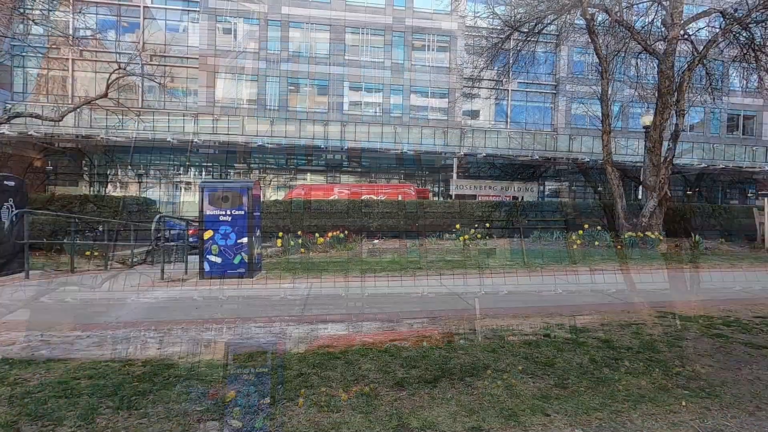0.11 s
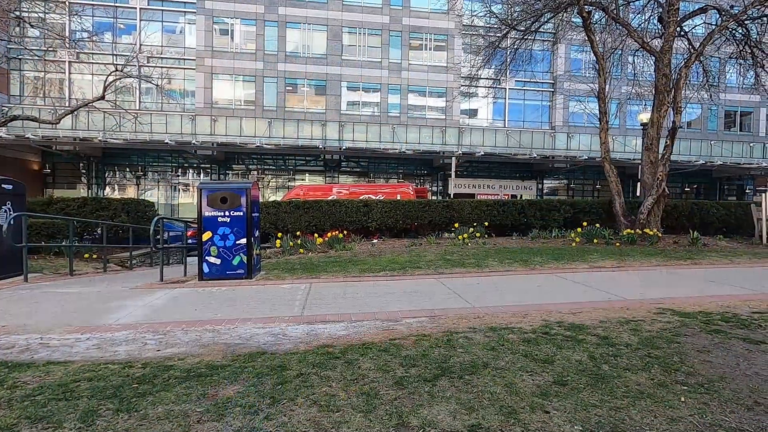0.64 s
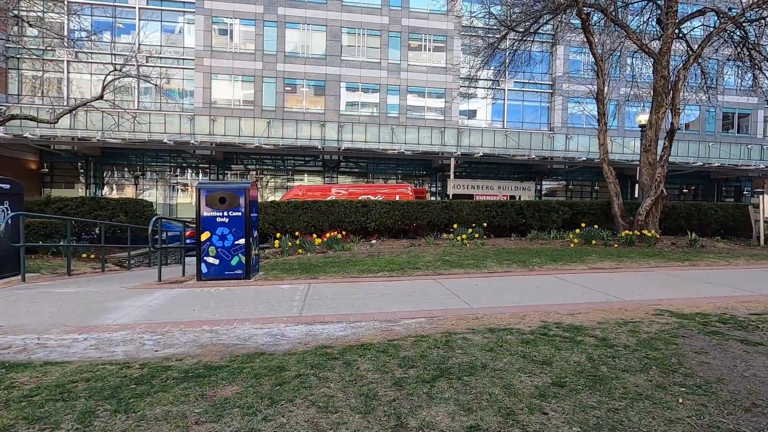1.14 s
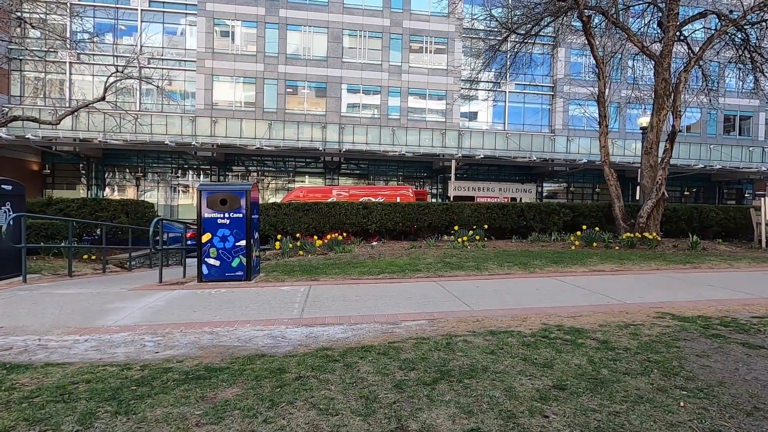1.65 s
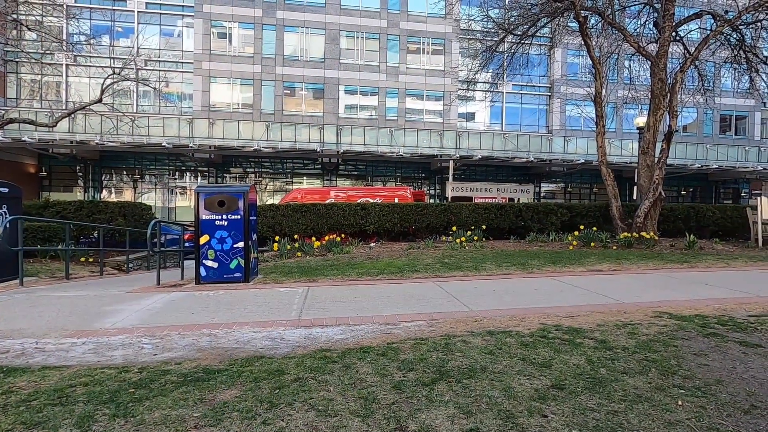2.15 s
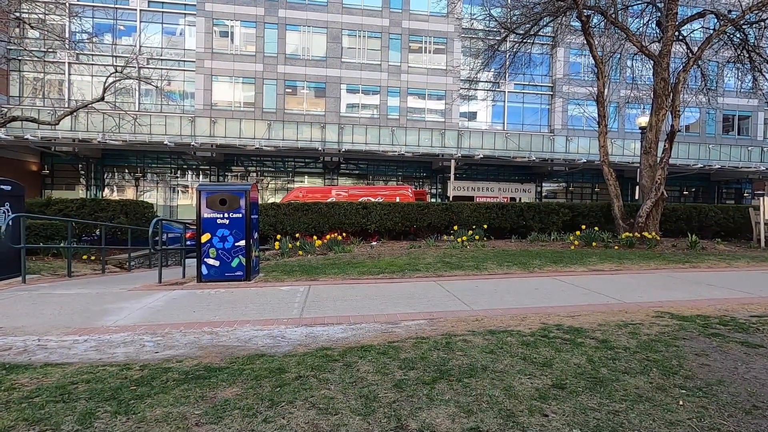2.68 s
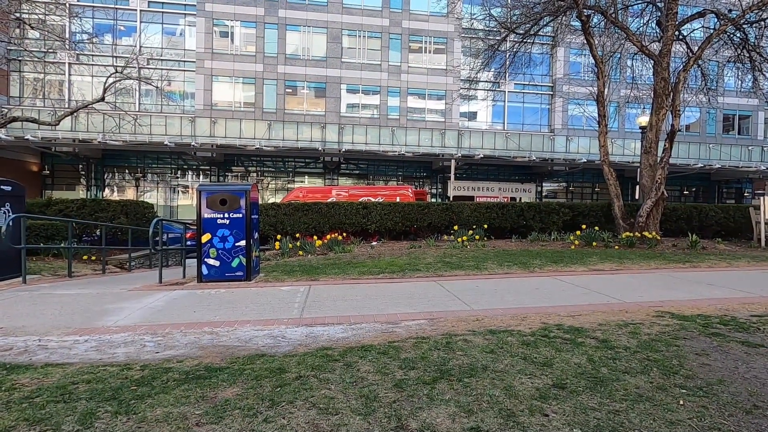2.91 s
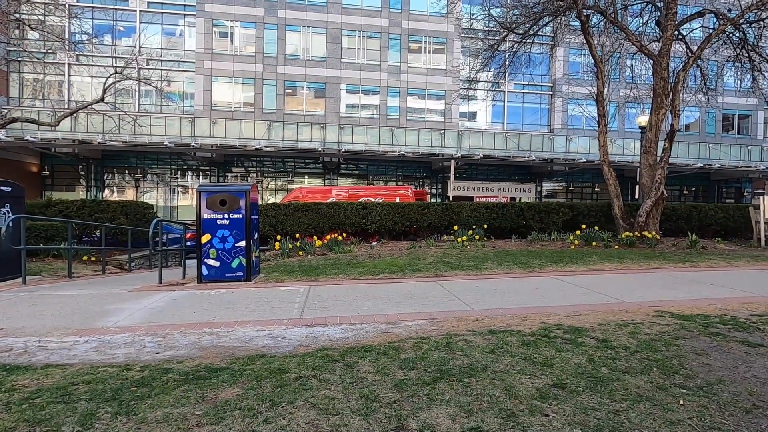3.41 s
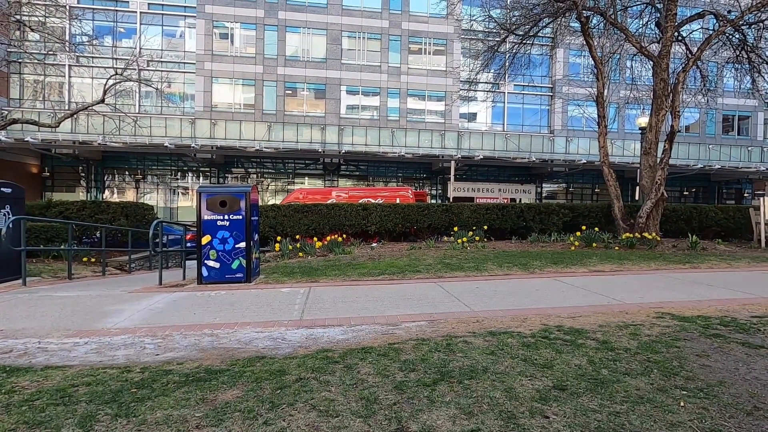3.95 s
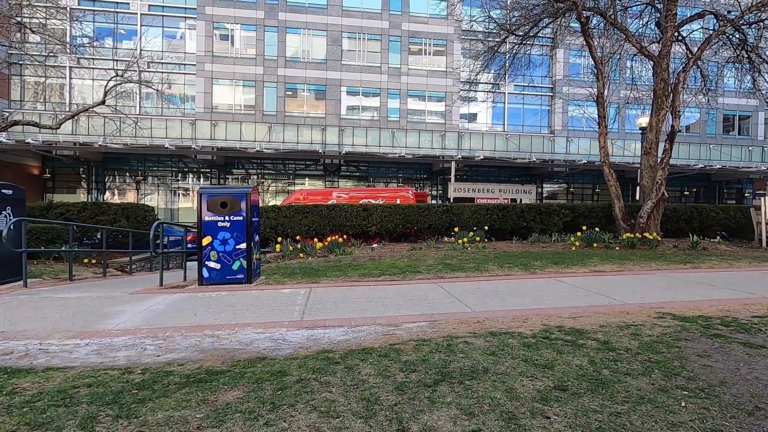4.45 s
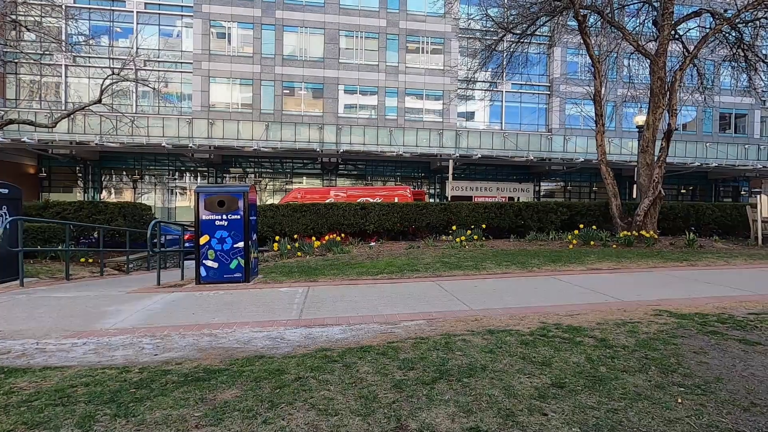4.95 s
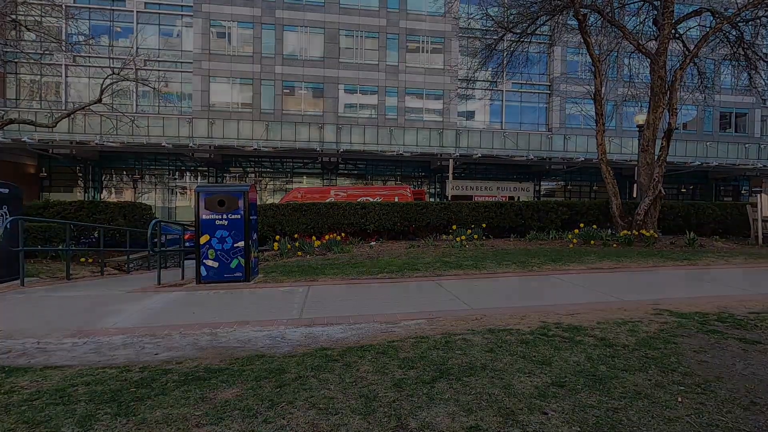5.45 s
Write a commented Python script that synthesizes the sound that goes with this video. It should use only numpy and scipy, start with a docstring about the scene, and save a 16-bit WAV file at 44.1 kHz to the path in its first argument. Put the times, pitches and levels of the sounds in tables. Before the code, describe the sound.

A quiet urban park in stereo. Throughout lies a low, soft traffic rumble with smooth tyre roar and an unsteady, slightly beating ventilation hum; it is fullest around 1 s, sinks from about 2 s and is fading out by 5.6 s. Slightly left, a starling begins with a thin, very high whistle until 0.4 s, with a tiny bill snap near 0.07 s. A soft, quick rattle swells and hooks upward at 0.7-1.0 s, a short buzz follows at 1.2 s, another rattle at 1.5-1.8 s and a buzz at 2.0 s. A louder, sinking trill runs from 2.3 to 2.6 s, ending in a brief buzz and slow flicks by 2.8 s. Slightly right, a sparrow gives bright two-note chirps near 0.3, 1.4, 2.3 and 3.8 s, and faintly at 5.1 s. Faint far birds dot the background, and a building returns a light echo.

```python
"""A starling to the left whistles, snaps its bill, rattles, buzzes and trills: sine voices with flicking pitch.
A sparrow to the right repeats a two-note chirp of gliding sines in a soft hiss; fainter birds call far off.
Under them a quiet city is heard from a park: traffic in shaped stereo noise and a ventilation plant humming
in unsteady sines, in time fading away. A building front echoes the birds with one slap and a noise-built tail."""
import sys
import numpy as np
from scipy import signal
from scipy.fft import rfft, irfft, next_fast_len
from scipy.io import wavfile
from scipy.ndimage import uniform_filter1d, map_coordinates

SR = 44100
rng = np.random.default_rng(int(sys.argv[2]) if len(sys.argv) > 2 else 0)


def decibels_to_gain(level_db):
    """Convert a level in decibels to a linear amplitude gain (20 dB per decade)."""
    exponent = np.asarray(level_db, float) / 20
    return 10 ** exponent


def waveform_to_disk(signal):
    """Save audio, clipped to [-1, 1], as 16-bit WAV at the path in sys.argv[1]."""
    frames = np.transpose(np.atleast_2d(signal))
    scaled = np.clip(frames, -1, 1) * 32767
    samples = np.round(scaled).astype(np.int16)
    wavfile.write(sys.argv[1], SR, samples)


N = 246067


def unit(x):
    """Scales to an rms of 1."""
    return x / np.sqrt(np.mean(x ** 2) + 1e-20)


def along(points, hz):
    """Reads a curve of (frequency, value) points on a log frequency axis."""
    f, v = np.transpose(points)
    return np.interp(np.log(hz + 1), np.log(f + 1), v)


def wobble(rate, size=N):
    """A smooth random curve with this many knots a second."""
    knots = rng.standard_normal(int(size * rate / SR) + 4)
    return map_coordinates(knots, [np.arange(size) * rate / SR])


def filtered(x, response):
    """Multiplies the spectrum by a complex response of frequency."""
    m = next_fast_len(N + 8192)
    return irfft(rfft(x, m) * response(np.fft.rfftfreq(m, 1 / SR)), m)[..., :N]


def shaped_noise(spectrum):
    """Mono noise of rms 1 with this spectrum."""
    return unit(filtered(rng.standard_normal(N), lambda hz: decibels_to_gain(along(spectrum, hz))))


def sampled(rows):
    """Sample times over the rows' span, then each column drawn as straight lines between the rows."""
    s, *cols = np.transpose(rows)
    t = np.arange(s[0], s[-1], 1 / SR)
    return t, *[np.interp(t, s, c) for c in cols]


def add(track, t, hz, db, overtone_db, waver_hz, flutter_db):
    """A sung tone: an unsteady sine with two rough overtones and a little air, with soft ends."""
    size = len(t)
    phase = 2 * np.pi * np.cumsum(hz + waver_hz * wobble(350, size)) / SR
    ends = np.clip(np.minimum(t - t[0], t[-1] - t) / .003, 0, 1)
    rasp = decibels_to_gain(overtone_db) * (0.77 + wobble(680, size))
    air = decibels_to_gain(-14) * rng.standard_normal(size)
    overtones = np.sin(2 * phase) + decibels_to_gain(-3) * np.sin(3 * phase) + air
    tone = np.sin(phase) + rasp * overtones
    level = decibels_to_gain(db + flutter_db * wobble(250, size))
    track[round(t[0] * SR):][:size] += np.sqrt(2) * ends * level * tone


def flicked(t, hz, db, flick_hz, gap_ms, growth_ms, sharp, swell_db, share, overtone_db,
            hush_db=16, hold_db=0):
    """A phrase whose pitch flicks upward once a beat, the voice swelling up it and sinking on the way down."""
    track, k = np.zeros(N), np.arange(60)
    beat_s = (k * gap_ms + growth_ms * k * (k - 1) / 2) / 1000
    beat = np.interp(t, t[0] + beat_s, k)
    effort = 1 + 0.11 * np.interp(beat, k, rng.standard_normal(len(k)))  # no two flicks alike
    flick = np.abs(np.cos(np.pi * beat)) ** (2 * sharp)
    held = np.sin(np.pi * beat) ** 4  # a level note between two flicks
    swell = swell_db * effort * flick * np.clip(flick_hz / 500, 0, 1)  # small flicks swell less
    rise_hz = flick_hz * (flick + share * held)
    fall_hz_per_s = -np.gradient(rise_hz) * SR
    hush = hush_db * np.clip(fall_hz_per_s / 10 ** 6, 0, 1)
    level_db = db + swell + hold_db * held - hush
    add(track, t, hz + rise_hz, level_db, overtone_db, waver_hz=122, flutter_db=1.5)
    return track


# stereo likeness of the city: frequency_hz, left_right_correlation
CITY_LIKENESS = [(40, .8), (120, .95), (300, .99), (1000, .84), (4300, .6), (9000, .2)]
# phase between the ports, also for sparrow and far birds: frequency_hz, left_lead_rad
STREET_LEAD = [(100, 0), (900, -.3), (3600, -.85), (5000, -.6), (7000, -1.2)]
# level between the ports: frequency_hz, left_over_right_db
CITY_LEAN = [(40, 1.3), (160, .3), (600, 2), (8000, 0)]


def rush(spectrum, patchy_db):
    """Stereo noise of rms 1 with faint patches in time and pitch, spread and tilted between the ports."""
    z = signal.stft(rng.standard_normal((2, N)), nperseg=512)[2]
    field = uniform_filter1d(rng.standard_normal(z.shape[1:]), 5, 0)
    patches = unit(uniform_filter1d(field, 12, 1))
    pair = signal.istft(z * decibels_to_gain(patchy_db * patches), nperseg=512)[1][:, :N]

    def spread(hz):
        turn = np.arccos(np.clip(along(CITY_LIKENESS, hz), -1, 1)) / 2
        return decibels_to_gain(along(spectrum, hz)) * [np.cos(turn), np.sin(turn)]

    def ports(hz):
        half = np.array([[.5], [-.5]])
        return decibels_to_gain(half * along(CITY_LEAN, hz)) * np.exp(1j * half * along(STREET_LEAD, hz))

    mid, side = filtered(pair, spread)
    return unit(filtered(np.array([mid + side, mid - side]), ports))


# city levels: time_s, rumble_db, tyre_roar_db
CITY_LEVELS = [(0, -37, -48), (1, -36, -47.5), (2.2, -37.5, -49.5), (3.2, -40.5, -51.5),
               (4.2, -42.5, -53.5), (4.699, -45.5, -57), (5.58, -51.5, -60.5)]
# engine rumble spectrum: frequency_hz, relative_db_per_hz
RUMBLE_SPECTRUM = [(10, -30), (18, -6.5), (48, 1), (200, -2), (290, -6), (450, -17.5), (700, -70),
                   (1000, -120)]
# tyre roar spectrum: frequency_hz, relative_db_per_hz
ROAR_SPECTRUM = [(180, -32), (300, -8.5), (400, -12.5), (700, -15.5), (1400, -24), (2200, -34), (3200, -40),
                 (5200, -48), (6300, -59.5), (9000, -65.5), (12000, -90.5), (16000, -120)]
# ventilation tones: pitch_hz, level_over_roar_db, waver_hz
FAN_TONES = [(295.7, -0.5, 0.41), (298.4, -3, 0.49), (597, -15, 2.94), (920, -19, 3), (210, -4, 6.6)]


def city():
    """Engines rumble and tyres roar as noise; the close fan tones beat against each other over them."""
    t = np.arange(N) / SR
    s, *levels = np.transpose(CITY_LEVELS)
    rumble_db, roar_db = [np.interp(t, s, level) for level in levels]
    hum = np.zeros(N)
    for hz, db, waver_hz in FAN_TONES:
        level = np.sqrt(2) * decibels_to_gain(db + 1.6 * wobble(3.93))
        hum += level * np.sin(2 * np.pi * np.cumsum(hz + waver_hz * wobble(6)) / SR)
    rumble = decibels_to_gain(rumble_db + 1.1 * wobble(2.94)) * rush(RUMBLE_SPECTRUM, patchy_db=0.36)
    roar_and_hum = decibels_to_gain(roar_db) * (rush(ROAR_SPECTRUM, patchy_db=0.86) + hum)
    fade_in = np.clip(t / .008, 0, 1)
    return fade_in * (rumble + roar_and_hum)


# starling's opening note: time_s, pitch_hz, level_db
WHISTLE_NOTE = [(0, 6700, -74), (.04, 6800, -86), (.06, 7540, -65.5), (.07, 7500, -78), (.095, 7500, -72),
                (.105, 7530, -69.5), (.13, 7280, -63.5), (.155, 8050, -65.5), (.2, 8010, -61),
                (.385, 7960, -61), (.403, 6960, -73)]


def whistle():
    """The starling's long thin opening note, almost a pure sine."""
    track = np.zeros(N)
    add(track, *sampled(WHISTLE_NOTE), overtone_db=-58, waver_hz=60, flutter_db=2)
    return track


# single far calls: start_s, length_s, start_hz, end_hz, arch_hz, level_db (at the middle)
FAR_CALLS = [(1.263, 0.041, 4170, 4250, -350, -68), (1.995, 0.044, 2850, 2695, 205, -66),
             (2.258, 0.023, 2710, 2230, 53, -60.5), (3.22, 0.055, 2800, 2670, 179, -73),
             (3.375, 0.032, 3000, 3250, -100, -73), (4.365, 0.022, 2800, 2940, 52, -76)]


def far_birds():
    """Short soft arched glides from further off, over a faint scattered chatter that fades with the city."""
    track = np.zeros(N)
    s, _, roar_db = np.transpose(CITY_LEVELS)
    when, size, low, fall, loud = rng.random((140, 5)).T
    first_s, first_hz = when * (N / SR - .1), 3000 + 2300 * low
    chatter_db = np.interp(first_s, s, roar_db) - 39 + 7 * loud
    chatter = np.transpose([first_s, .015 + .025 * size, first_hz, first_hz - 900 * fall,
                            300 * size, chatter_db])
    for start_s, length_s, start_hz, end_hz, arch_hz, db in [*FAR_CALLS, *chatter]:
        u = np.arange(0, length_s, 1 / SR) / length_s
        arch = np.sin(np.pi * u)
        pitch_hz = start_hz + (end_hz - start_hz) * u + arch_hz * arch
        add(track, start_s + u * length_s, pitch_hz, db - 9 * (1 - arch),
            overtone_db=-40, waver_hz=50, flutter_db=1.5)
    return track


# starling's bill: start_s, level_db (before onset and decay), pitch_hz
BILL_SNAPS = [(.068, -47, 6560)]


def bill_snap():
    """The bill clicks shut: a sine and bright noise that start at once and die within milliseconds."""
    track = np.zeros(N)
    t = np.arange(SR // 100) / SR
    for s, db, hz in BILL_SNAPS:
        envelope = decibels_to_gain(db - 60 * t / 0.0042) * (1 - np.exp(-t / 0.00019))
        click = .3 * np.diff(rng.standard_normal(len(t) + 1))
        track[round(s * SR):][:len(t)] += envelope * (np.sin(2 * np.pi * hz * t) + click)
    return track


# sparrow's chirps: start_s, level_db, pitch_factor
SPARROW_CALLS = [(.291, -50, 1.037), (1.4435, -48.5, 0.99), (2.27, -52.5, 1.01), (3.754, -52, 1.01),
                 (5.09, -62, 1)]
# two notes and a thin upper voice, a list each: time_from_start_s, pitch_hz (before factor), relative_db
CHIRP_NOTES = [
    [(0, 3970, -17), (.009, 4500, -14.5), (.015, 4680, -7.5), (.024, 3780, -8.5), (.04, 3620, -10.5),
     (.049, 3350, -9)],
    [(.056, 3100, -14), (.07, 3330, -7.5), (.085, 3340, -6.5), (.09, 2833, -9.5), (.096, 3270, -11.5),
     (.102, 2750, -15)],
    [(.024, 5300, -22.5), (.03, 5350, -18), (.036, 5300, -24), (.051, 3800, -18.5), (.064, 4500, -26)],
]
# hiss around each chirp: frequency_hz, relative_db_per_hz
BREATH_SPECTRUM = [(2500, -60.5), (3300, -6), (5000, 0.5), (7000, -9.5), (12000, -22), (15000, -61)]


def sparrow():
    """One chirp of gliding sines in a soft hiss, repeated a little louder, softer, higher or lower."""
    breath_db, breath_lead_s, breath_s = -22.5, 0.061, 0.058  # breath_s: length of the rise and of the fall
    track, puff, time = np.zeros(N), np.zeros(N), np.arange(N) / SR
    for s, level_db, factor in SPARROW_CALLS:
        peak_s = s - breath_lead_s + breath_s
        puff += decibels_to_gain(level_db + breath_db) * np.clip(1 - np.abs(time - peak_s) / breath_s, 0, 1)
        for note in CHIRP_NOTES:
            t, hz, db = sampled(note)
            add(track, t + s, factor * hz, db + level_db, overtone_db=-32, waver_hz=45, flutter_db=1.5)
    return track + puff * shaped_noise(BREATH_SPECTRUM)


# hiss of the bill under a rattle: frequency_hz, relative_db_per_hz
BILL_HISS = [(4300, -60), (5200, 1), (7600, -6.5), (8300, -60)]


def rattle(first, top, hz, db, gap_ms, growth_ms, swell_db):
    """Flicks swell on one pitch, then melt into a climbing hook that breaks off downward."""
    rise_db, full_s, flick_hz = 13.5, 0.18, 800  # swells by rise_db, full this long before the top
    hook_s, hook_bend, hook_top_hz, hook_under_db = .11, 1.9, 7500, 7  # hook_under_db: below the flicks
    drop_s, drop_hz, hiss_db = 0.011, 5100, 4.5  # hiss_db: over the voice between flicks
    t = np.arange(first, top + drop_s, 1 / SR)
    climb = np.clip(1 - (top - t) / hook_s, 0, 1)
    drop = np.clip((t - top) / drop_s, 0, 1)
    pitch_hz = hz + (hook_top_hz - hz) * climb ** hook_bend + (drop_hz - hook_top_hz) * drop
    full = top - full_s
    softer_db = rise_db * np.clip((full - t) / (full - first), 0, 1)
    level_db = db - softer_db + (swell_db - hook_under_db) * climb
    hiss_level = decibels_to_gain(level_db + hiss_db) * (1 - climb) ** 2
    hiss = np.interp(np.arange(N) / SR, t, hiss_level, left=0, right=0) * shaped_noise(BILL_HISS)
    voice = flicked(t, pitch_hz, level_db, flick_hz * (1 - climb), gap_ms, growth_ms, 2.7, swell_db,
                    share=0.25, overtone_db=-28)
    return hiss + voice


# soft rattles: first_flick_s, hook_top_s, pitch_hz, level_db, first_gap_ms, gap_growth_ms (a flick),
# flick_swell_db
RATTLE_CALLS = [(.68, 1.025, 5760, -77, 20.2, 0.02, 14), (1.4985, 1.822, 5280, -81, 17.5, 0.36, 19)]


def rattles():
    """The starling's soft rattles, about 50 flicks a second."""
    return sum(rattle(*row) for row in RATTLE_CALLS)


BUZZ_GAP_MS = 6.45
# starling's buzzes: dip_s, level_db, pitch_factor, length_factor
BUZZ_CALLS = [(1.191, -50, .99, .9), (1.985, -51.5, 1.016, 1.05)]
# one buzz around its loud dip, before the factors: time_from_dip_s, pitch_hz, relative_db, flick_hz
BUZZ_SHAPE = [(-.135, 5720, -29, 299), (-.07, 5490, -14.5, 597), (-.03, 5800, -9, 404),
              (-.014, 5710, -5, 697), (0, 5060, -0.5, 1170), (.016, 5530, -8, 907), (.032, 6320, -3.5, 930),
              (.062, 6400, -7.5, 820), (.088, 6310, -12.5, 800), (.096, 6270, -20, 500),
              (.104, 4560, -21.5, 100.2)]


def buzzes():
    """About 155 flicks a second fuse into a buzz."""
    track = np.zeros(N)
    for s, level_db, factor, length in BUZZ_CALLS:
        rows = np.multiply(BUZZ_SHAPE, [length, factor, 1, 1]) + [s, 0, level_db, 0]
        track += flicked(*sampled(rows), BUZZ_GAP_MS, 0, 0.97, swell_db=0, share=0,
                         overtone_db=-27, hush_db=13)
    return track


# loud sinking trill with its upswing: time_s, pitch_hz, level_db, flick_hz
TRILL_PHRASE = [(2.325, 5700, -72, 900), (2.37, 5080, -61, 1301), (2.42, 4680, -51, 1500),
                (2.45, 4330, -51, 1650), (2.48, 3970, -53, 1752), (2.535, 4000, -54, 1701),
                (2.548, 4300, -65, 496), (2.562, 6050, -62.5, 1.5), (2.585, 6030, -73.5, -5)]


def trill():
    """Wide flicks, about 50 a second and slowing, with a note held between them."""
    return flicked(*sampled(TRILL_PHRASE), 17.8, 0.37, 4.6, swell_db=4.5, share=.38,
                   overtone_db=-21, hold_db=3)


# closing phrase, buzzed part: time_s, pitch_hz, level_db, flick_hz
CLOSING_BUZZ = [(2.586, 6100, -66, 395), (2.65, 5560, -57.5, 885), (2.675, 5640, -57.5, 596),
                (2.69, 5850, -53.5, 99)]
# closing phrase, rattled part: time_s, pitch_hz, level_db, flick_hz
CLOSING_RATTLE = [(2.679, 5840, -66.5, 1.5), (2.69, 5930, -50.5, 48), (2.71, 6150, -53.5, 599.5),
                  (2.76, 6380, -57, 313), (2.78, 6500, -66.5, 1.5), (2.81, 6440, -77, -2)]


def closing_phrase():
    """The starling ends on fast flicks that give way to slow ones."""
    buzzed = flicked(*sampled(CLOSING_BUZZ), BUZZ_GAP_MS, 0, 0.89, swell_db=7, share=0, overtone_db=-27)
    rattled = flicked(*sampled(CLOSING_RATTLE), 21.3, 0, 4.4, swell_db=7.5, share=0, overtone_db=-26.5)
    return buzzed + rattled


# starling's colour, mostly on its overtones: frequency_hz, gain_db
THROAT_COLOUR = [(7400, -0.5), (8800, 6.5), (9900, -8.5), (12300, 3.5)]


def starling():
    """All the starling's sounds after its opening whistle begins, coloured by the throat."""
    track = bill_snap() + rattles() + buzzes() + trill() + closing_phrase()
    return filtered(track, lambda hz: decibels_to_gain(along(THROAT_COLOUR, hz)))


def placed(x, left_db, lead):
    """Sets a source in stereo by a level difference and a phase lead between the ports."""
    side = np.array([[.5], [-.5]])
    return filtered(x, lambda hz: decibels_to_gain(side * left_db) * np.exp(1j * side * along(lead, hz)))


# echo tail of the buildings: frequency_hz, t60_s
FRONT_DECAY = [(2500, .6), (7000, .85)]


def echoes(x, slap_db, tail_db):
    """Branches blur the call at once; one slap comes off the nearest front, amid a diffuse tail."""
    hz, t, z = signal.stft(rng.standard_normal((2, SR)), SR, nperseg=256)
    late = decibels_to_gain(-60 * t / along(FRONT_DECAY, hz)[:, None])
    blur = 4.5 * decibels_to_gain(-60 * t / .07)
    tail = signal.istft(z * (late + blur), SR, nperseg=256)[1]
    diffuse = signal.fftconvolve(x[None], tail / np.linalg.norm(tail[0]), axes=1)[:, :N]
    slap = np.pad(x, (round(.036 * SR), 0))[:N]
    return decibels_to_gain(slap_db) * slap + decibels_to_gain(tail_db) * diffuse


# phase between the ports for the starling: frequency_hz, left_lead_rad
TREE_LEAD = [(4000, .1), (5600, 0.99), (6700, .6), (7700, 1.2), (8600, 2.3), (9700, 1.6), (12000, 2.4)]


def scene():
    """Sets the birds in stereo over the city and adds their echoes."""
    left_bird, right_bird, far = whistle() + starling(), sparrow(), far_birds()
    birds = placed(left_bird, 1.5, TREE_LEAD)
    birds = birds + placed(right_bird, -0.7, STREET_LEAD) + placed(far, 6.8, STREET_LEAD)
    space = echoes(left_bird, slap_db=-20.5, tail_db=-9.5)
    space = space + echoes(right_bird, slap_db=-13.5, tail_db=-7.5)
    space = space + echoes(far, slap_db=-14, tail_db=0)
    return city() + birds + space


def low_pass(x):
    """Removes everything above the highest recorded frequency."""
    return signal.sosfilt(signal.butter(12, 15500, fs=SR, output="sos"), x)


# treble roll-off: frequency_hz, gain_db
MICROPHONE_RESPONSE = [(9500, 1), (16000, -21.5)]


def record(dry):
    """The small stereo microphone rolls off at the top; a constant faint noise floor lies beneath."""
    heard = filtered(dry, lambda hz: decibels_to_gain(along(MICROPHONE_RESPONSE, hz)))
    hiss = decibels_to_gain(-99) * rng.standard_normal(dry.shape)
    return low_pass(heard + hiss)


dry = scene()
out = record(dry)
waveform_to_disk(out)
```